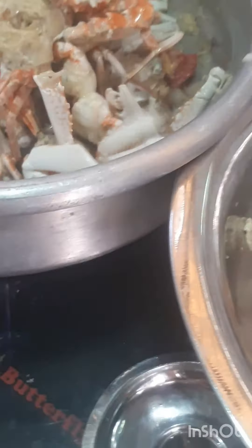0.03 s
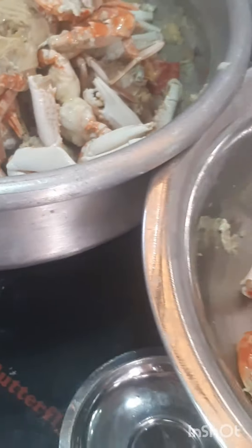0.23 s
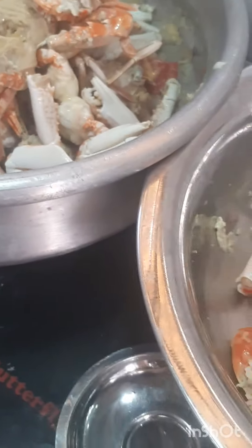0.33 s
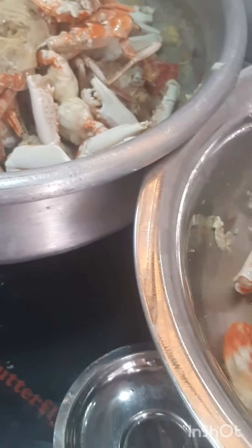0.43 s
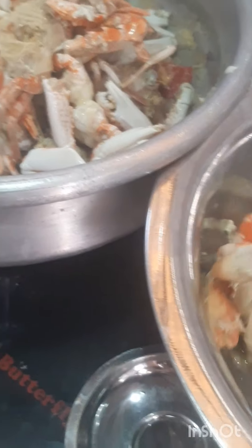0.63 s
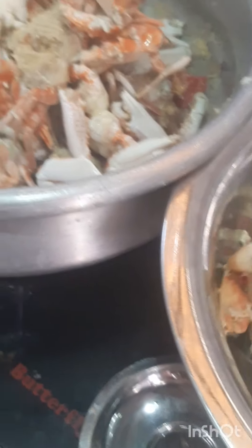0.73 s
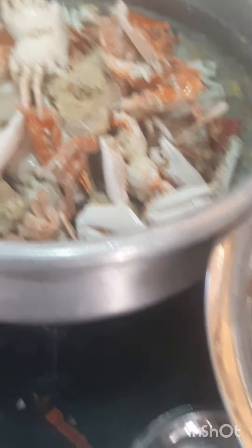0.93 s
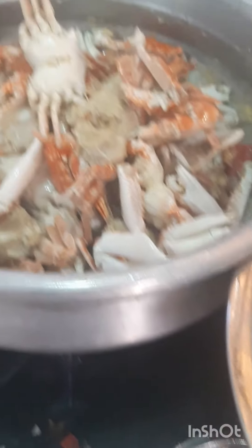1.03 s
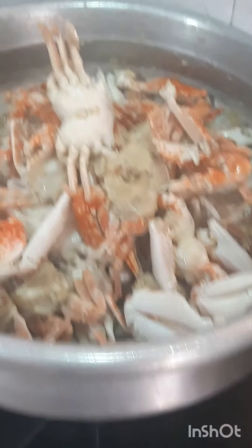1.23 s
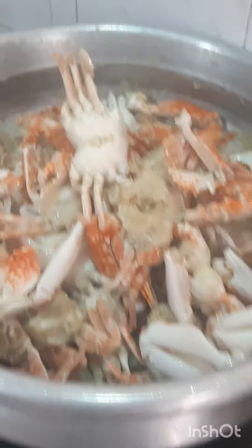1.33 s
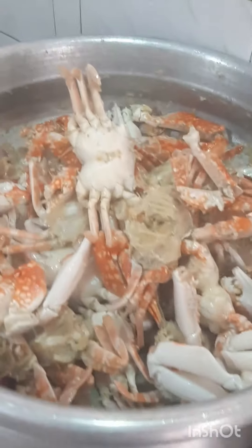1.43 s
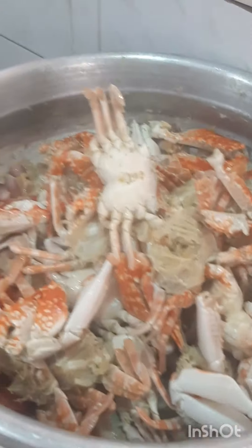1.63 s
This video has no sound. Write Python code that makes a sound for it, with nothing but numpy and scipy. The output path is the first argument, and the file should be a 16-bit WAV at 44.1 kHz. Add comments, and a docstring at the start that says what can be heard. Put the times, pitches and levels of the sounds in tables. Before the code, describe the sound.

Crab shells clack and scrape as they are scooped about in a metal pot.

```python
"""Cooked crab pieces are scooped about in a metal pot, their hard shells clacking together and on its wall.
Between the knocks they scrape, rustle and tumble, and one crisp shell drags across the heap.
Every contact rings the pot briefly, damped by its load. Soft low bumps and a quiet hiss lie underneath.
Heard close to the pot in a small kitchen, on a stereo pair of microphones."""
import sys
import numpy as np
from scipy import signal
from scipy.fft import rfft, irfft
from scipy.io import wavfile
from scipy.ndimage import uniform_filter1d

SR = 44100
rng = np.random.default_rng(int(sys.argv[2]) if len(sys.argv) > 2 else 0)


def master(y):
    """Save y as 16-bit WAV."""
    cut = np.clip(np.atleast_2d(y).T, -1, 1)
    pcm = np.round(cut * 32767)  # scale
    wavfile.write(sys.argv[1], SR, pcm.astype(np.int16))


N = 74970


def amp(db):
    """Decibels to gain."""
    return 10 ** (np.asarray(db) / 20)


def unit(x):
    """Scales to rms 1."""
    return x / np.sqrt(np.mean(x ** 2) + 1e-20)


def read(points, hz):
    """Reads a table on a log-frequency axis."""
    f, value = np.transpose(points)
    return np.interp(np.log(hz + 1), np.log(f + 1), value)


def add(mix, s, sound):
    """Mixes a stereo sound in at s seconds."""
    part = mix[:, max(round(s * SR), 0):][:, :sound.shape[1]]
    part += sound[:, :part.shape[1]]


def pan(db):
    """Gains that put the left microphone db above the right."""
    return amp(np.array([[db], [-db]]) / 2)


def colour(x, spectrum, tilt=lambda hz: 0, size=4096):
    """Causal filter of unit power with the given spectrum, then an optional tilt in dB."""
    hz = abs(np.fft.fftfreq(size, 1 / SR))
    log_gain = np.log(unit(amp(read(spectrum, hz))) * amp(tilt(hz)) + 1e-6)
    minimum_phase = np.exp(np.conj(signal.hilbert(log_gain)))
    taps = np.fft.ifft(minimum_phase).real[:size // 2]
    return signal.fftconvolve(x, taps[None], axes=1)[:, :x.shape[1]]


# How alike the two microphones hear. Each row: frequency in Hz, left-right correlation.
MIC_LIKENESS = [(30, 0.49), (100, 0.98), (300, 0.93), (700, 0.59), (1500, 0.29), (5000, 0.26),
                (16000, 0.15)]

def stereo_noise(size):
    """White noise, alike on both sides in the bass and unlike in the treble."""
    a, b = rfft(rng.standard_normal((2, size)))
    same = read(MIC_LIKENESS, np.fft.rfftfreq(size, 1 / SR))
    mid, side = a * np.sqrt((1 + same) / 2), b * np.sqrt((1 - same) / 2)
    return irfft(np.array([mid + side, mid - side]), size)


# The background of the kitchen. Each row: frequency in Hz, relative spectral level in dB.
HISS_COLOUR = [(15, -83), (25, -21), (102, -9), (211, -8), (299, -12.5), (382, -28.5), (414, -2.5),
               (500, -13), (542, -3.5), (672, -15.5), (729, -14.5), (1930, -10.5), (3490, -13),
               (3880, -8.5), (6660, -9), (8050, -20.5), (15800, -18.5)]

def hiss(db=-47.5):
    """A quiet, steady hiss lies behind the pot."""
    return amp(db) * colour(stereo_noise(N), HISS_COLOUR)


# The room around the pot. Each row: frequency in Hz, seconds to die away by 60 dB.
KITCHEN_DECAY = [(150, 0.19), (400, 0.48), (1200, 0.21), (5000, .36), (14000, 0.12)]

def kitchen_echo(x, db=-12.5, first_echo_s=0.006):
    """The near, hard walls of a small kitchen return a short reverberation."""
    reflections = stereo_noise(SR // 2) * (np.arange(SR // 2) > first_echo_s * SR)
    hz, t, bands = signal.stft(reflections, SR, nperseg=256)
    decay = np.exp(-np.log(1000) * t / read(KITCHEN_DECAY, hz)[:, None])
    tail = signal.istft(bands * decay, SR, nperseg=256)[1]
    return amp(db) * signal.fftconvolve(x, tail / np.linalg.norm(tail[0]), axes=1)[:, :N]


# Low bumps, just left of centre. Each row: time in seconds, peak in dB, pitch in Hz.
BUMPS = [(.396, -23.5, 330), (0.419, -35, 207), (.466, -24, 257), (0.648, -49, 320), (0.776, -34.5, 200),
         (0.911, -41.5, 205), (1.057, -48, 286), (1.108, -52, 288), (1.171, -41, 271), (1.238, -32.5, 267),
         (1.281, -36, 297), (1.354, -37, 275), (1.466, -44, 298), (1.549, -41.5, 270), (1.638, -31.5, 255),
         (1.698, -33, 235)]
BUMP_SWELL_S, BUMP_LEAD_S = 0.0018, 0.00407

def bump(db, hz):
    """A soft, dull push of two or three cycles."""
    t = np.arange(SR // 10) / SR
    age = t / BUMP_SWELL_S
    swell = age ** 2 * np.exp(-age)
    tone = np.sin(2 * np.pi * (hz * t + rng.random()))
    return amp(db) * pan(1.0) * swell / swell.max() * tone


# The loaded metal pot, close by. Each row: resonance in Hz, relative strength in dB, width in Hz.
POT_MODES = [(336, 0.5, 14), (541, 5.5, 7.7), (641, 1, 9.8), (675.4, 5, 15), (869.5, 2, 12.6),
             (1377, -3, 11), (1473.5, 2.5, 9.1), (1730, 4, 16), (2635, 2, 19), (3400, 5.5, 24),
             (3810, 5.5, 25), (4560, -2, 26), (4794, 4, 22), (5230, -0.5, 48), (5375, -1.5, 41),
             (5640, -13, 13), (5640, -5, 23), (6540, -2, 22), (7210, 3, 15)]

def pot_ring(contacts, ring_db=-1.5):
    """Every contact drives the pot's narrow resonances, which ring on briefly."""
    ring = sum(amp(db) * signal.lfilter(*signal.iirpeak(hz, hz / width, fs=SR), contacts)
               for hz, db, width in POT_MODES)
    return amp(ring_db) * ring


def friction(levels, spectrum, grain_db, side_db, slips_per_s=7200, slip_s=0.00048):
    """Rubbing shells make dense tiny slips of uneven size, which follow a level curve."""
    slipping = rng.random(N) < slips_per_s / SR
    slips = slipping * amp(grain_db * np.minimum(rng.exponential(1, N), 5))
    energy = signal.lfilter([1], [1, -np.exp(-1 / (slip_s * SR))], slips ** 2)
    rustle = unit(colour(stereo_noise(N) * np.sqrt(energy), spectrum))
    level_db = np.interp(np.arange(N) / SR, *np.transpose(levels))
    return rustle * pan(side_db) * amp(level_db)


# The heap in the pot, dead ahead. Each row: time in seconds, level in dB.
TUMBLE_LEVELS = [(0, -41), (.1, -51), (.375, -50), (.395, -36.5), (.45, -32.5), (.51, -30.5), (.56, -38),
                 (.62, -41.5), (.67, -42.5), (.78, -54.5), (.83, -46), (.9, -58), (1.21, -53.5),
                 (1.24, -41.5), (1.285, -43.5), (1.35, -48), (1.41, -57), (1.58, -56), (1.64, -48.5),
                 (1.7, -59)]
# Its dull tone. Each row: frequency in Hz, relative spectral level in dB.
TUMBLE_COLOUR = [(60, -9.5), (130, -33.5), (200, -3.5), (310, 0), (420, -10.5), (540, -4), (780, -3),
                 (1100, -5), (1450, -3), (2000, -13.5), (3500, -9.5), (8000, -34.5), (16000, -49)]

def tumble():
    """The heap shifts with a dull rumble of pieces."""
    return friction(TUMBLE_LEVELS, TUMBLE_COLOUR, grain_db=1, side_db=0.1)


# A single drag, near the centre. Each row: time in seconds, level in dB.
CRUNCH_LEVELS = [(0, -90), (1.09, -67), (1.125, -43), (1.158, -39), (1.175, -31), (1.205, -49.5),
                 (1.26, -56), (1.35, -90)]
# Its crisp tone. Each row: frequency in Hz, relative spectral level in dB.
CRUNCH_COLOUR = [(350, -54), (600, -22), (737, -24), (943, -22), (1610, -11), (1770, -11), (2060, -4),
                 (2980, -7), (3750, 0), (6320, -6), (6860, 2.5), (8420, -11.5), (15800, -9)]

def crunch():
    """One crisp shell drags across the heap."""
    return friction(CRUNCH_LEVELS, CRUNCH_COLOUR, grain_db=2.5, side_db=0.5)


# Scraping, a little toward the right microphone. Each row: time in seconds, level in dB.
SCRAPE_LEVELS = [(0, -29.5), (.045, -36), (.15, -42), (.31, -44.5), (.33, -27.5), (.37, -30), (.44, -28.5),
                 (.5, -27.5), (.565, -27), (.63, -35), (.69, -44), (.78, -46.5), (.825, -39.5),
                 (.88, -49.5), (1.1, -55), (1.22, -39.5), (1.32, -52.5), (1.58, -50), (1.625, -44),
                 (1.7, -45.5)]
# Its bright tone. Each row: frequency in Hz, relative spectral level in dB.
SCRAPE_COLOUR = [(88, -44.5), (150, -4), (483, -23.5), (713, -6.5), (937, -11), (1070, -11.5),
                 (1780, -10.5), (2000, -12), (3320, -3.5), (4040, -4.5), (5310, -0.5), (6840, 1.5),
                 (7830, -9.5), (14100, -8.5), (15800, -13.5)]

def scrape():
    """Shells slide over each other and the metal."""
    return friction(SCRAPE_LEVELS, SCRAPE_COLOUR, grain_db=2.5, side_db=-1.5)


# The tone all knocks share. Each row: frequency in Hz, relative spectral level in dB.
SHELL_COLOUR = [(35, -44), (60, -49), (136, -6.5), (322, -6.5), (478, -13.5), (856, -11.5), (1270, -9),
                (1500, -4), (1610, -12.5), (1810, -5.5), (1980, -19), (2390, -4), (3020, -11.5), (3310, -6),
                (4090, -7), (5280, 0), (6070, -11), (6670, -0.5), (8220, -17.5), (13700, -14.5),
                (15800, -11)]
# Band corners in Hz, in order: end of the bass, both ends of the middle and of the clack, start of the top.
BAND_HZ = [300, 600, 1700, 3000, 7000, 8200]
# Knocks in the pot, close up. Each row: start in seconds, relative level in dB, bass, middle and top
# in dB against the clack band, seconds to die away by 60 dB, left over right in dB,
# the piece's own resonance in Hz, its lift in dB.
KNOCKS = [ (0.0194, -28, -22, 1.5, -9, 0.024, 1.5, 7300, 6.5),
          (.1088, -44.5, -10, -3, 10, 0.024, 5, 10000, 7), (0.2244, -16, 2.5, 3, 6, 0.072, -2.5, 5220, 8),
          (0.2361, -17.5, 3, 2.5, 4.5, 0.11, -1.5, 5840, 4.5),
          (0.2421, -20.5, 6, 5, 6.5, 0.11, 2.5, 3410, -3), (.3176, -23.5, 2.5, 0, 3.5, 0.059, -2, 6000, 8),
          (.3862, -25.5, -2.5, -3, 3, 0.091, 2, 326, 5), (.4080, -26, 7, -0.5, 0, 0.19, -0.5, 1510, 9.5),
          (0.4532, -21, -9, 0, 1, 0.038, -2.5, 2170, 21), (0.4564, -16, 0.5, 6.5, 3.5, 0.12, -1, 1410, 4.5),
          (0.4688, -21.5, 1, 11, -7, 0.11, -1, 3000, 10.5),
          (.4957, -21.5, -18, 4.5, 2, 0.063, -3, 3120, 10.5),
          (.6080, -23, -20, -27, -3, 0.041, -4.5, 4300, 7), (0.6453, -34, 1.5, 7, -28, 0.15, -1.5, 830, 7),
          (1.1115, -42, -14, -1, 0, 0.03, -3, 3400, 15), (1.1400, -39, -24, -9, 3, .03, -2, 2970, 15),
          (1.197, -36.5, -20, -18, 6, 0.038, -2, 10100, 13.5),
          (1.2229, -38.5, 7.5, 7.5, 7, 0.053, -3, 910, 17.5),
          (1.2700, -42.5, 13.5, 4.5, 0, 0.074, -1, 3870, 11.5), ]
KNOCK_GAIN_DB, CHATTER_DB, RISE_S = 3, 3, 0.00073
SNAP_S, SNAP_DB = 0.00057, 0.5  # the instant of contact
PIECE_HALF_WIDTH_OCTAVES = 0.22

def knock(db, bass_db, middle_db, top_db, t60, side_db, piece_hz, lift_db):
    """A hard shell lands: a snap, then a rattling crack coloured by the piece."""
    def tilt(hz):
        bands_db = np.interp(hz, BAND_HZ, [bass_db, middle_db, middle_db, 0, 0, top_db])
        detuning = np.log2((hz + 1) / piece_hz) / PIECE_HALF_WIDTH_OCTAVES
        return bands_db + lift_db / (1 + detuning ** 2)

    t = np.arange(SR // 2) / SR
    flutter = unit(uniform_filter1d(rng.standard_normal(len(t)), size=50))
    chatter = unit(amp(CHATTER_DB * flutter))
    crack = np.minimum(t / RISE_S, 1) * np.exp(-np.log(1000) * t / t60) * chatter
    snap = amp(SNAP_DB) * np.exp(-t / SNAP_S)
    burst = stereo_noise(len(t)) * (crack + snap)
    return amp(db + KNOCK_GAIN_DB) * pan(side_db) * colour(burst, SHELL_COLOUR, tilt)


def scene():
    """Shells knock and scrape in the pot; soft bumps, the kitchen's echo and a hiss surround them."""
    shells = scrape() + tumble() + crunch()
    for s, *row in KNOCKS:
        add(shells, s, knock(*row))
    near = shells + pot_ring(shells)
    for s, db, hz in BUMPS:
        add(near, s - BUMP_LEAD_S, bump(db, hz))
    return near + kitchen_echo(near) + hiss()


# The lean of the microphone pair. Each row: frequency in Hz, left over right in dB.
MIC_BALANCE = [(120, 0.5), (280, 1), (550, 1.5), (1100, 0.5), (2200, 0.5), (4500, -1.5), (8000, 2),
               (13000, -1)]
LOW_CUT_HZ, HIGH_CUT_HZ = 118, 15850

def record(dry):
    """Two slightly unlike microphones with a bass cut, the full-scale limit, then the band limit."""
    lean_db = read(MIC_BALANCE, np.fft.rfftfreq(2 * N, 1 / SR)) / 2
    heard = irfft(rfft(dry, 2 * N) * amp([lean_db, -lean_db]))[:, :N]
    heard = signal.lfilter(*signal.butter(2, LOW_CUT_HZ, "high", fs=SR), heard)
    high_cut = signal.firwin(511, HIGH_CUT_HZ, window=("kaiser", 9), fs=SR)
    return signal.oaconvolve(np.clip(heard, -1, 1), high_cut[None], "same")


dry = scene()
out = record(dry)
master(out)
```